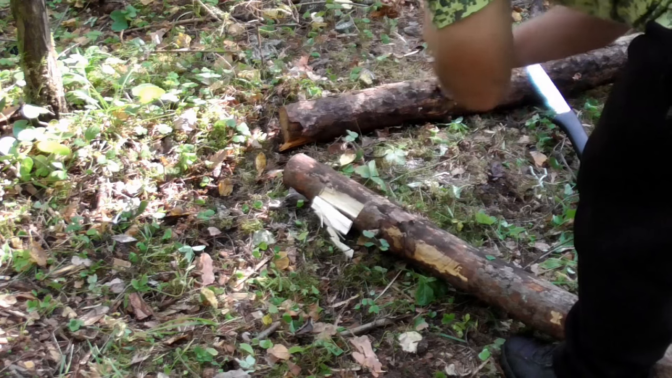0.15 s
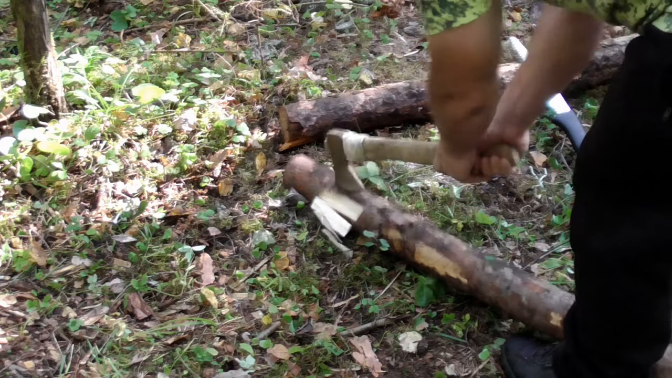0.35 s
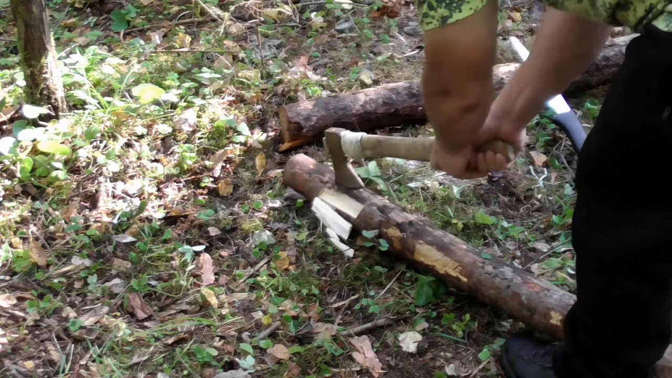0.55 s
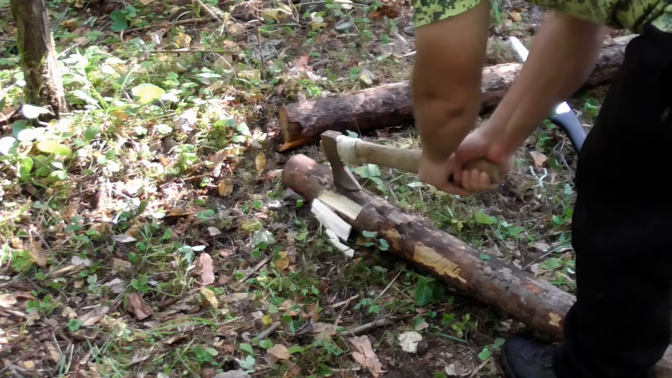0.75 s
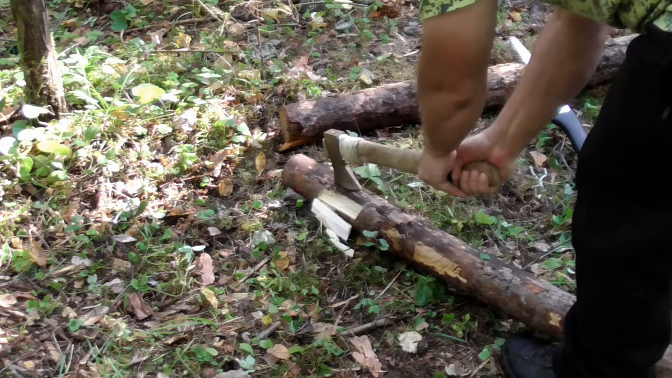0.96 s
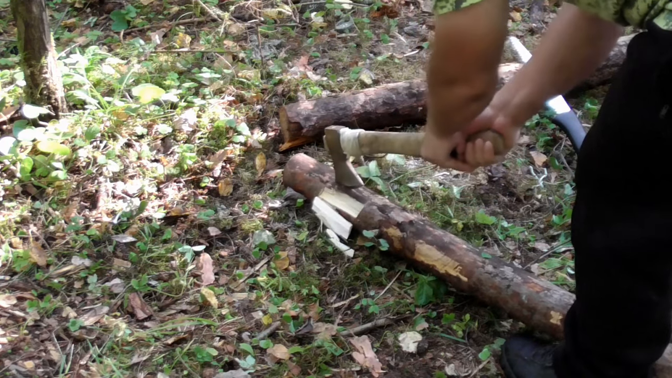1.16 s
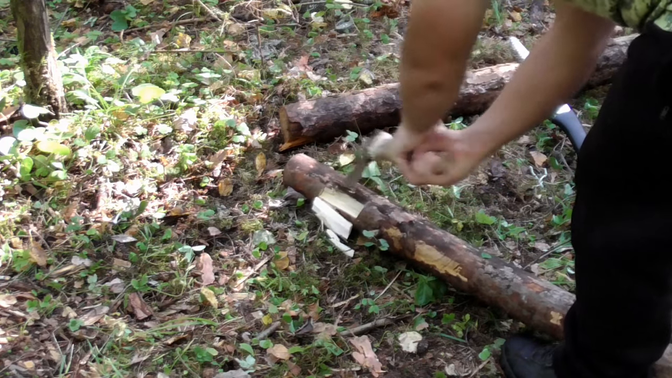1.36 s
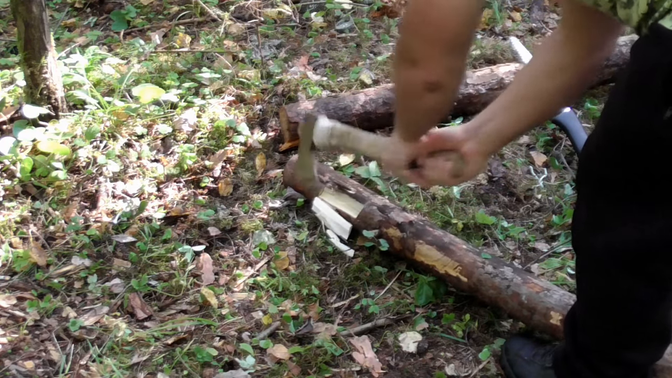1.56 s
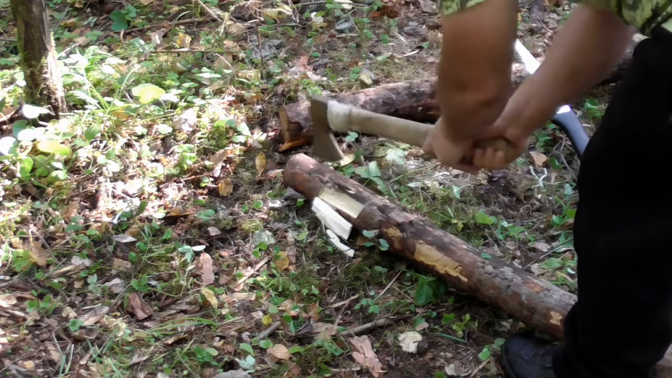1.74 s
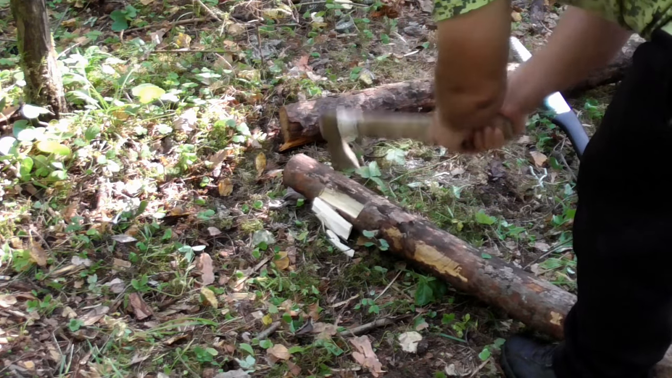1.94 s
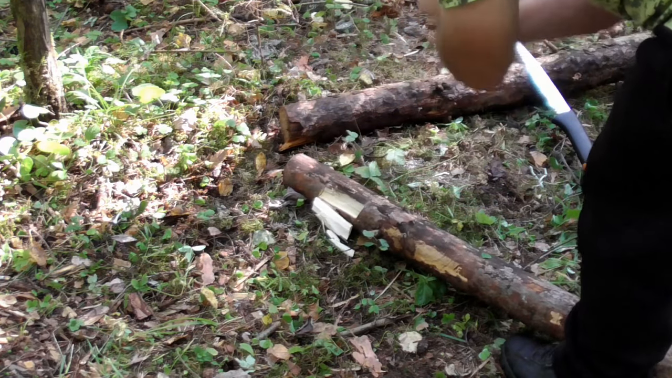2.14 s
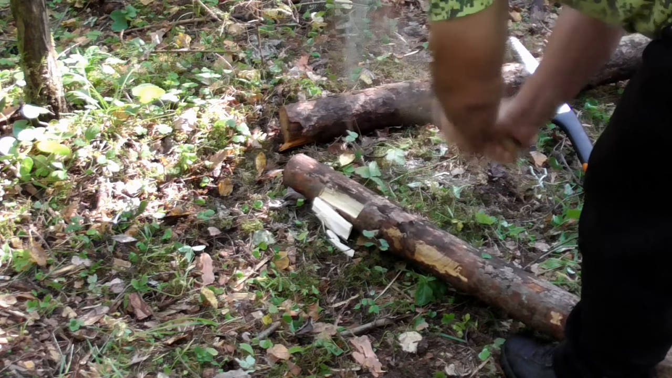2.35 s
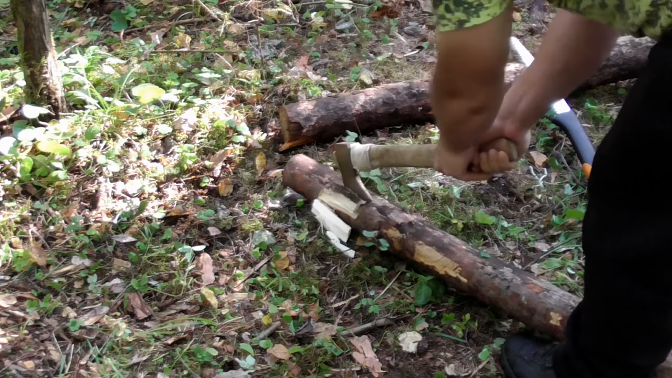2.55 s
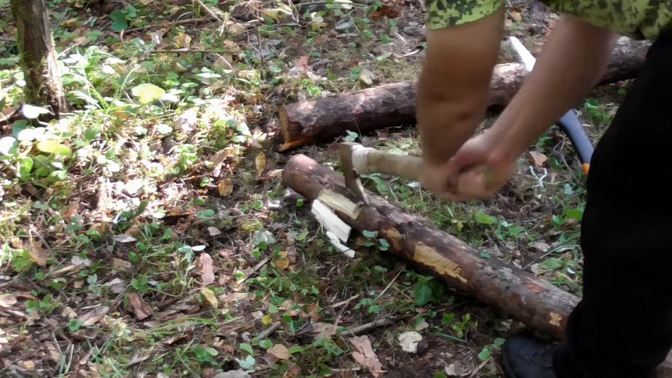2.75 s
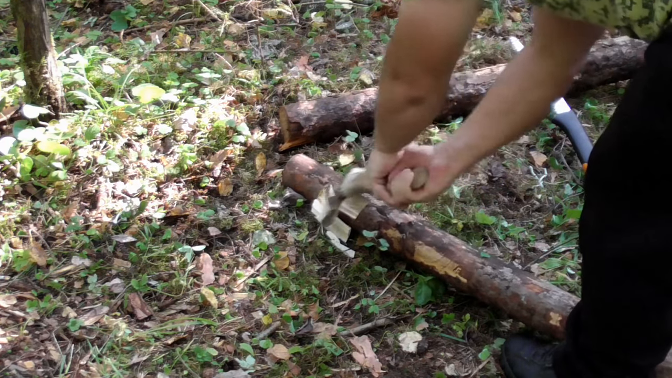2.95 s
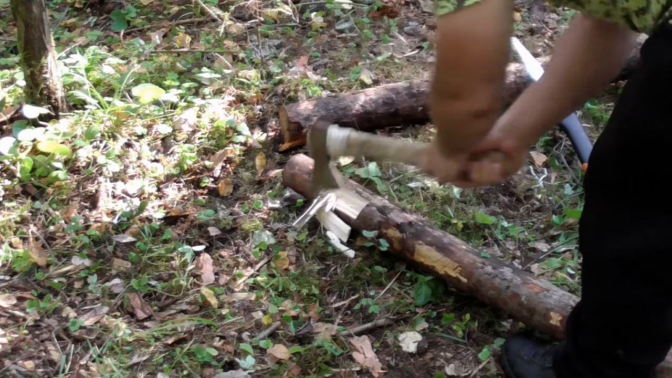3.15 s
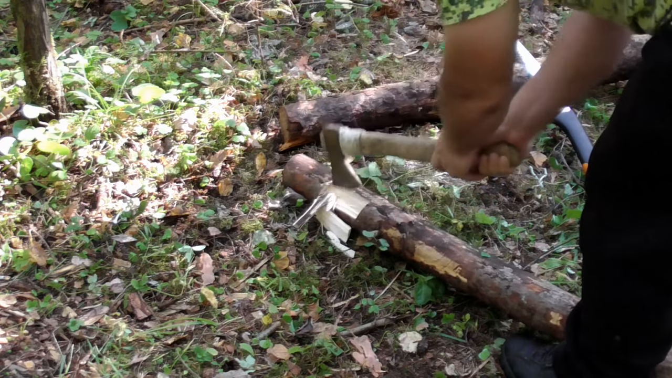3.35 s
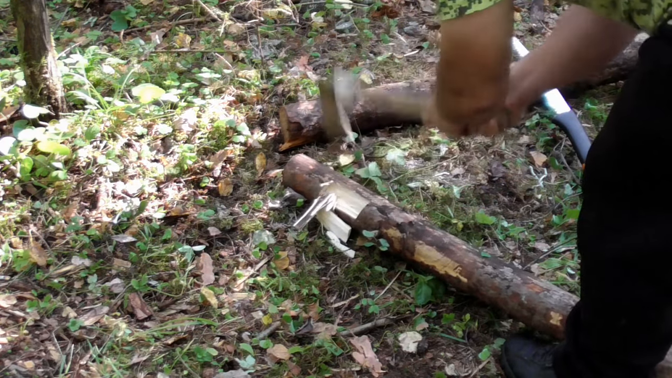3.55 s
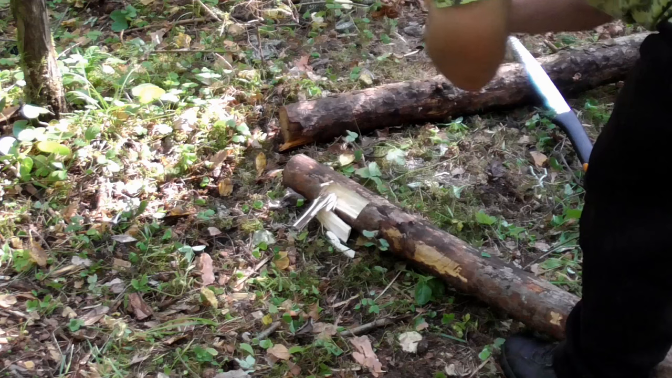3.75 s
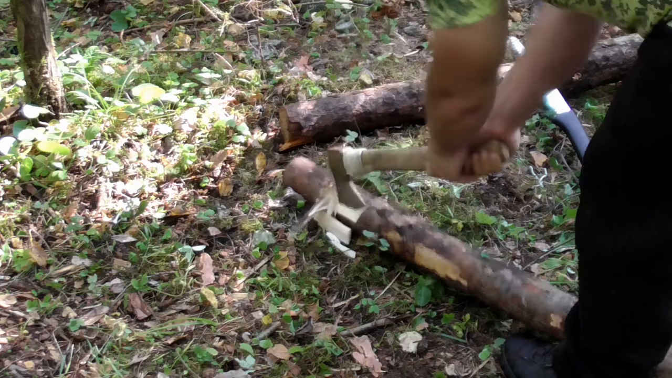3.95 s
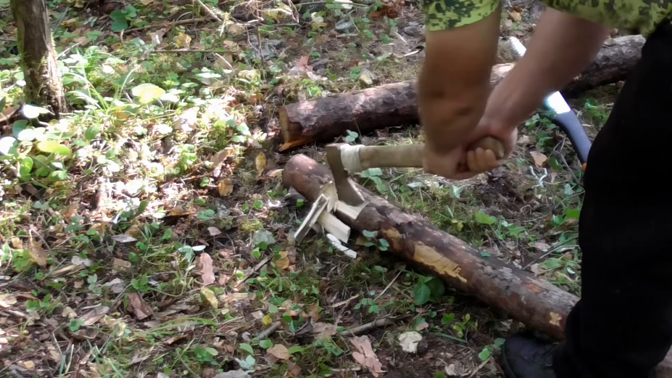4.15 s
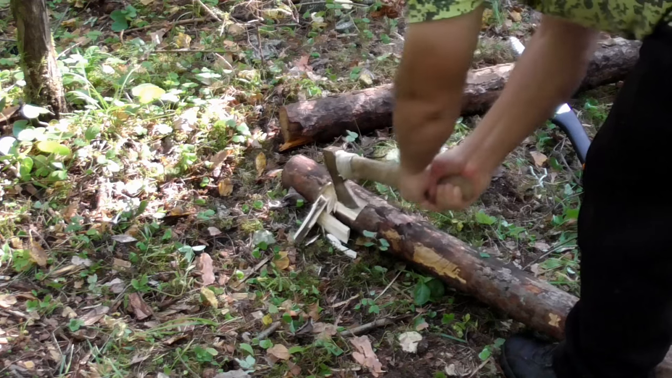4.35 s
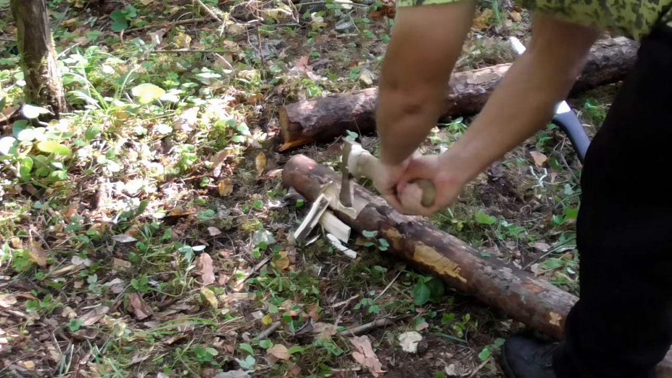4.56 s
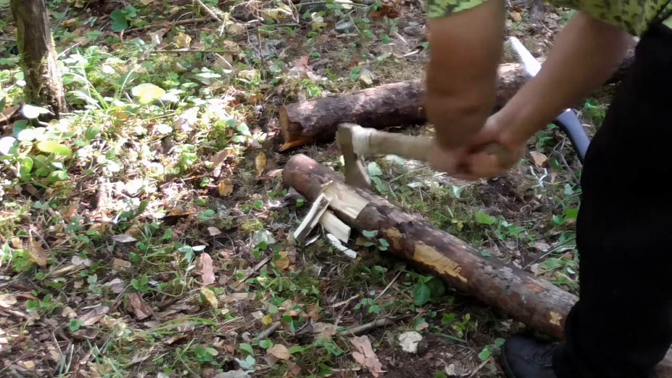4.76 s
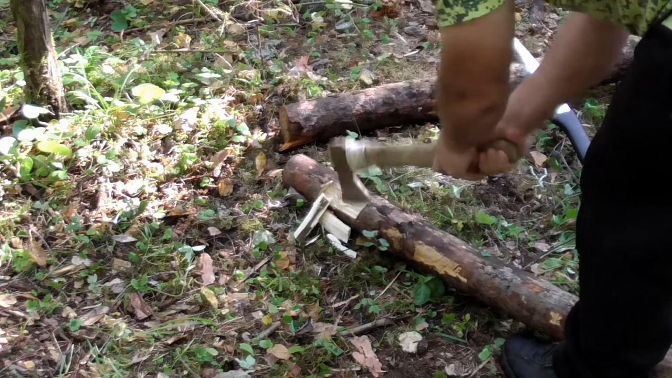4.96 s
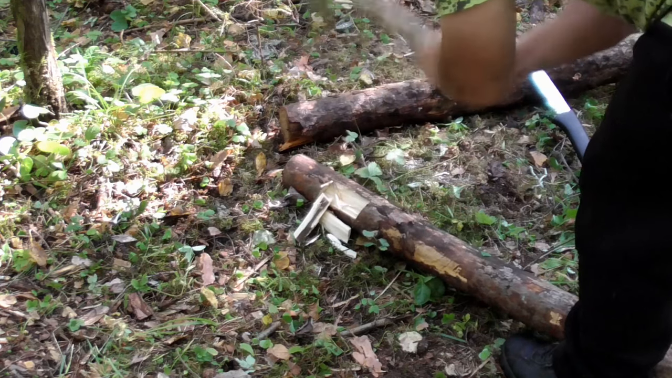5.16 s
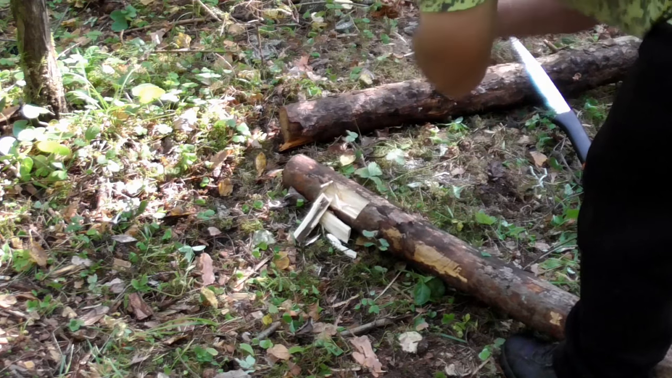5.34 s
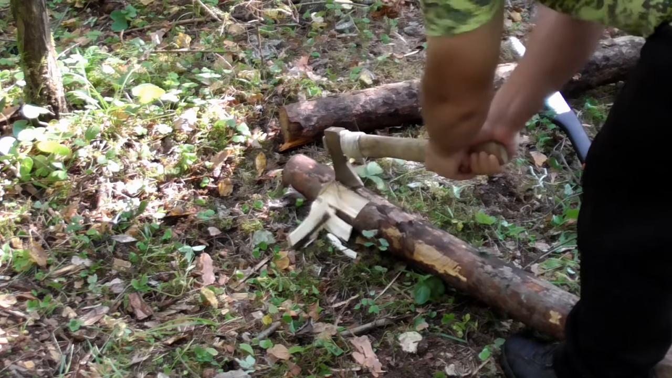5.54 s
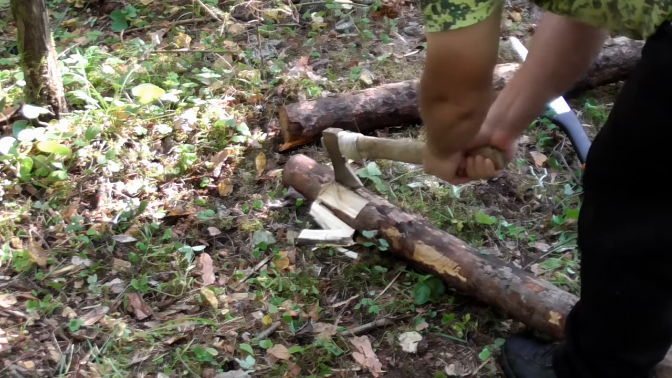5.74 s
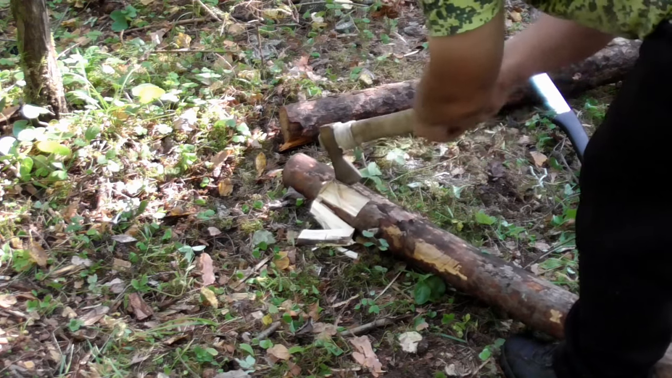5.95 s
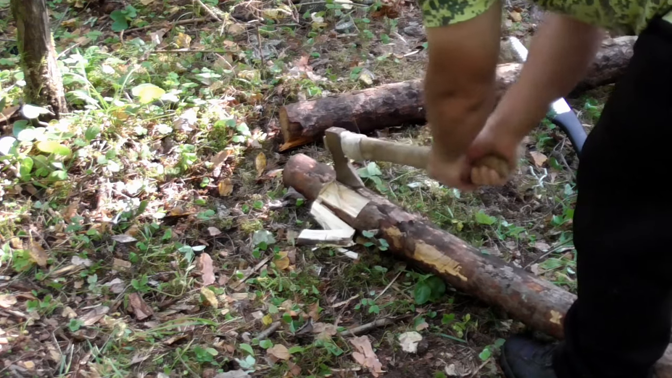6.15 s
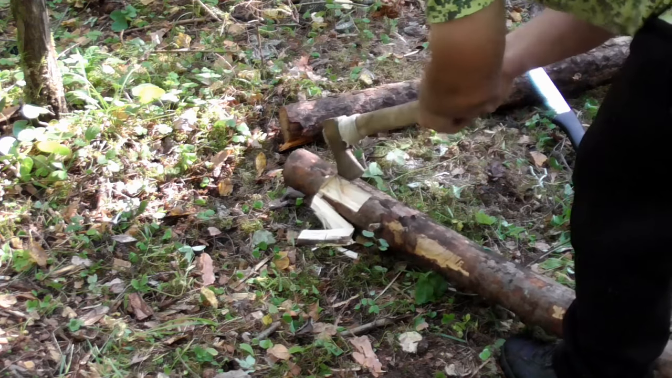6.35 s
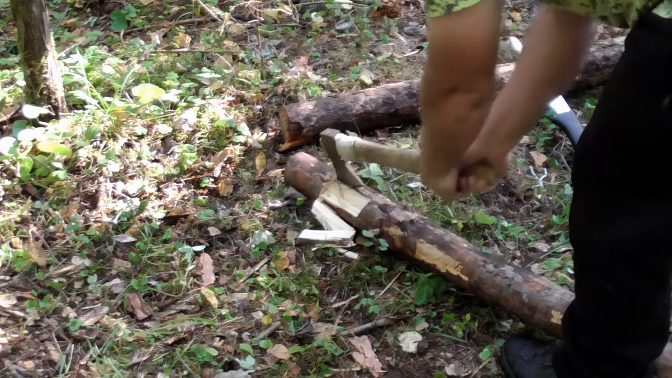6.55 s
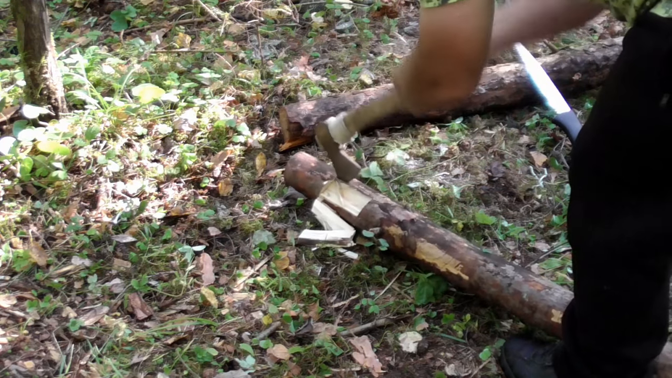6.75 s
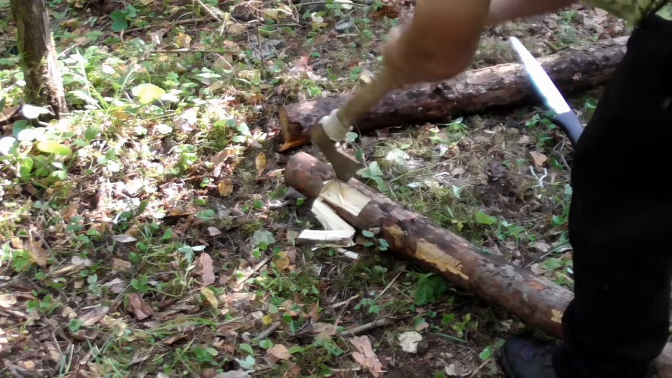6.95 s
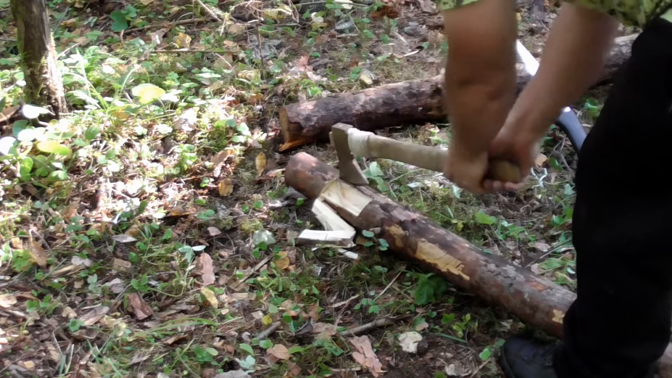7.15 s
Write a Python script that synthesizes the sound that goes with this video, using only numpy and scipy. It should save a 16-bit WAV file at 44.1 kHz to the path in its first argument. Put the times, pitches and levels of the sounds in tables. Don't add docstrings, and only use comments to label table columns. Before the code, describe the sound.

Outdoors in a quiet forest, a close stereo microphone hears an axe working on a log. A low, distant road hum and faint hiss run throughout. At 0.4 s a hard blow cracks sharply, with a short woody knock and a scattered echo from the trees. Small ticks follow, then a loud fibre snap at 1.4 s. A light aiming tap at 1.95 s leads to the hardest, brightest blow at 2.5 s. From 2.8 to 3.1 s the levered blade tears and snaps fibres, ending in tiny steel chinks. A very faint, dull tap at 3.5 s precedes another hard chop at 4.0 s. Dense splintering bursts out between 4.4 and 4.65 s, with a weak creak near 4.75 s. A soft tap at 5.05 s, with a slight chink, sets up the last hard blow at 5.55 s. Levels dip briefly after loud cracks. Afterwards only faint chip ticks and slight rasps remain, until about 7.2 s.

```python
import sys
import numpy as np
from scipy import signal
from scipy.fft import rfft, irfft, next_fast_len
from scipy.io import wavfile
from scipy.ndimage import uniform_filter1d

SR = 44100
rng = np.random.default_rng(int(sys.argv[2]) if len(sys.argv) > 2 else 0)


def attenuation_scalar(level_db):
    decades = np.asarray(level_db, float) / 20
    return 10 ** decades


def transcribe(signal):
    frames = np.atleast_2d(signal).T
    limited = np.clip(frames, -1, 1)
    pcm = np.round(limited * 32767).astype(np.int16)
    wavfile.write(sys.argv[1], SR, pcm)


N = 321930

# start in seconds, crack level in dB, then the low, middle and high
# log modes in dB relative to the crack.
BLOWS = [
    (0.433, -8.5, -9, -13, -1.5),
    (1.9532, -25, -13.5, -39, -11),
    (2.472, -2.5, -20.5, -26, -10),
    (3.502, -38.5, -2.5, 3.5, -24),
    (4.0333, -7, -14.5, -11, -10),
    (5.056, -30, -11.5, -2.5, -3.5),
    (5.5601, -6, -14.5, -19.5, -11.5),
]
# cutting time in seconds, rasp after it in dB,
# bump at 1.5 kHz in dB, shove level in dB, shove frequency in Hz.
CUTS = [(0.0032, -15, -4, 4, 836), (0.0003, 4, -2, -7, 280), (0.0035, -12, 2, -1.5, 870),
        (0.0056, 13, 22, 11.5, 430), (0.0054, -9.5, 6, -1.5, 650), (0.0045, -27.5, 1, 7, 660),
        (0.0032, -15, -10.5, -1, 684)]
# frequency in Hz, level in dB per Hz.
CRACK_SPECTRUM = [(240, -20.5), (400, -5), (913, -9), (1700, -18.5), (2360, -11.5), (3650, -16), (4900, -9),
                  (5730, -16), (8320, -4.5), (9570, -12), (12700, -5.5), (15700, -33), (16500, -33)]
# frequency in Hz, level in dB, t60 in seconds.
SOIL_MODE = (68, -5, 0.24)
# frequency in Hz, level in dB, t60 in seconds.
LOG_MODES = [(173.5, 4, 0.12), (262.3, 2.5, .14), (411.5, 3.5, 0.09), (733, -5.5, .07)]
# frequency in Hz, level in dB, t60 in seconds.
HANDLE_MODES = [(534, -16.5, 0.025), (872, -4.5, 0.022), (1160, -7, 0.03), (1407, -10, 0.031),
                (2142, -10.5, 0.034)]
# start in seconds, level in dB, frequency in Hz, t60 in seconds.
CHINKS = [(3.04, -45, 3320, 0.046), (3.078, -38, 4360, 0.041), (3.131, -41.5, 4260, 0.026),
          (4.8, -60, 8500, 0.16), (4.845, -56, 8450, 0.08), (5.118, -56.5, 8500, 0.061),
          (5.108, -47, 5400, 0.017)]
# start in seconds, level in dB, frequency in Hz, t60 in seconds,
# roughness of the phase in radians.
STEEL_HUMS = [(2.479, -42.5, 4490, 0.36, 1.03), (4.04, -54.5, 4360, 0.27, 1.02),
              (5.569, -55, 4165, 0.84, .7)]
# start in seconds, level in dB, then the woody, mid and top shares in relative dB.
THICK_FIBRES = [(1.3817, -24.5, -13.5, -13, -1.5), (1.3951, -26, -13.5, -9.5, -7),
                (1.3988, -24, -4.5, -10, 1), (1.403, -6.5, -18.5, -7.5, -6.5),
                (1.432, -26.5, -26, -15, -8.5), (2.8091, -25.5, -6.5, -0.5, -5),
                (2.8412, -23.5, -13.5, -5.5, -2), (2.8652, -19, -37.5, -14, -1),
                (2.9105, -15.5, -5, 6.5, 1.5), (2.933, -12.5, -12.5, 1.5, -8), (2.9377, -16.5, -9, -1, -10),
                (2.9456, -26.5, -10.5, -10, -3), (3.06, -27, -5.5, -2.5, -6),
                (4.4155, -25, -18.5, -4.5, -17.5), (4.445, -19, -39.5, -20, -4), (4.4616, -25, -14, 1, -15),
                (4.466, -11.5, -19.5, -7.5, -6.5), (4.4846, -24, -33.5, -3, -5.5),
                (4.5601, -15, -20, -8, -10.5), (4.5706, -9, -16.5, -9.5, -2), (4.5785, -19, -22, -4.5, 3),
                (4.5852, -11.5, -25, -6, -7), (4.6215, -10, -11, -6, -9.5), (4.7564, -36, -7.5, 8, -7)]
# start in seconds, level in dB, then the woody and mid shares in relative dB.
THIN_FIBRES = [(.446, -31.5, -10, -24.5), (.7051, -53.5, -28, -19), (.793, -45.5, -22.5, -10),
               (.9281, -46, -27, -21), (.9493, -45, -32, -15), (6.381, -52, -2, -16),
               (.9929, -51.5, -35, -11), (1.0026, -45, -38, -21), (1.1938, -53.5, -3, -8.5),
               (1.393, -28.5, -9, -6), (2.7976, -33, -14.5, -3), (2.8336, -40.5, -4, -5.5),
               (2.8438, -30, -33.5, 4), (2.8753, -26.5, -20, -12.5), (2.8809, -28.5, -8, -10.5),
               (2.8959, -32.5, -26, -10), (2.9893, -30.5, -19, -2), (3.0466, -35.5, -10, -10.5),
               (3.1417, -36.5, -12, -2), (4.3592, -48, -3, -12.5), (4.5006, -39.5, -12.5, -2.5),
               (4.5271, -29.5, -10, -3), (4.5658, -20, -13.5, -5), (4.5825, -17.5, -7, -8),
               (4.5877, -20.5, -27, -17.5), (4.77, -42.5, -23, 8), (5.7477, -43.5, -5, 6),
               (5.765, -42.5, -30.5, 11), (6.157, -54, -3, -17), (6.172, -49, -10, -4.5)]
# frequency in Hz, width in Hz, level in dB.
FIBRE_MODES = [(190, 340, -13), (695.6, 2000, -2.5), (2150, 3300, -1.5), (5140, 2000, -4), (7500, 2600, -3),
               (11800, 3800, -1.5)]
# start in seconds,
# level in dB, rise in dB per second, hold in seconds, fall in dB per second.
RASPS = [(0.763, -69.5, 300, .2, 296), (0.992, -56, 400, 0.013, 400), (1.389, -37, 901, 0.016, 256.5),
         (2.866, -48.5, 898, .02, 448), (2.936, -45.5, 608, .01, 249.5), (3.06, -49, 200, 0.014, 400),
         (3.133, -54, 400, .015, 1500), (4.349, -64.5, 298, 0.045, 106), (4.415, -51, 3000, .03, 102),
         (4.464, -40.5, 498, .02, 146), (4.565, -35.5, 400, 0.027, 1200), (4.754, -51.5, 2996, .028, 1500),
         (5.74, -60, 504, .02, 399.5), (6.36, -64.5, 200, 0.022, 199), (7.137, -65, 228, 0.043, 200)]
# frequency in Hz, level in dB per Hz.
SPLINTER_SPECTRUM = [(1180, -43.5), (2000, -10.5), (3060, -9.5), (3310, -3), (4020, -8.5), (5280, -4.5),
                     (7650, -4), (9210, -1), (12200, -7), (15400, -17.5), (16500, -31.5)]
# frequency in Hz, t60 in seconds.
NEAR_TREES_T60 = [(200, 0.23), (1500, 0.34), (3300, 0.37), (4300, 0.33), (5500, 0.36), (9000, 0.67),
                  (14000, 0.68)]
# frequency in Hz, level in dB.
NEAR_TREES_COLOUR = [(200, 1), (800, 4), (2000, -11), (3000, -6.5), (4500, 0.5), (6000, -3.5), (8000, -2.5),
                     (11500, -5), (15000, -10.5), (17000, -27)]
# frequency in Hz, level in dB.
FAR_TREES_COLOUR = [(300, -16.5), (1500, -5.5), (3400, -14.5), (4300, -11), (5500, -20.5), (9000, -28.5),
                    (14000, -35)]
# frequency in Hz, level in dB per Hz.
ROAD_SPECTRUM = [(9.4, -76.5), (16, -28.5), (32, -25.5), (86, -13), (206, -11), (278, -5.5), (366, -4),
                 (399, -2), (453, -4), (549, -4.5), (806, -9), (916, -13), (1210, -18), (1660, -30.5),
                 (2600, -43), (3380, -75.5), (5720, -120)]
# frequency in Hz, level in dB per Hz.
HISS_SPECTRUM = [(1290, -33.5), (2200, 0), (2430, -9.5), (2650, -8), (2960, -7.5), (3620, -8), (4210, -5),
                 (5800, -10.5), (10600, -2.5), (11600, -3.5), (14400, -3.5), (16100, -18), (16500, -34)]
# frequency in Hz, left-right likeness from 0 to 1.
LIKENESS = [(60, 1), (125, 0.81), (350, 0.71), (700, 0.66), (1400, .33), (2800, 0.23), (5600, 0.39),
            (11000, 0.0052)]
# frequency in Hz, left-right level in dB.
PORT_COLOUR = [(60, 1), (300, 1), (1400, 1.56), (2800, -1.25), (5600, 0.8), (11000, -2)]
# frequency in Hz, lead of the left port in radians.
PORT_LEAD = [(60, .1), (430, .1), (1460, -.2), (5430, -.2), (8100, -.4), (8610, -.9), (9470, -2.9),
             (10300, -6.3)]
# start in seconds, gain loss in dB.
DUCKS = [(.44, 1), (1.41, 3.5), (2.48, 9), (2.94, 5), (4.04, 1.5), (4.6, 6), (5.57, 5.5)]

THUD_DB = -4.5
TILT_DB, TILT_GROWS = -0.5, 0.1
BUMP_HZ, DIP_HZ, DIP_DB = 1480, 2976, -5
SHOVE_T60_S, SHOVE_RISE = 0.012, 0.15
RASP_SPAN_DB = 28
THIN_DB, THIN_SPREAD_DB = (-20, -8, -5.5), (4, -0.5, 3.5)
PAN_SPREAD_DB = 5.5
STRAY_PER_S, STRAY_DB, STRAY_SPREAD_DB = 80, 8.5, 4
STRAY_TOP_DB, STRAY_FROM_DB = -30, -52
ROAD_DB, HISS_DB = -49.5, -69


def unit(x):
    return x / np.sqrt(np.mean(x ** 2, axis=-1, keepdims=True) + 1e-20)


def along(points, hz):
    f, value = np.transpose(points)
    return np.interp(np.log(hz + 1), np.log(f + 1), value)


def filtered(x, response):
    n = x.shape[-1]
    m = next_fast_len(n + min(n, 8192))
    return irfft(rfft(x, m) * response(np.fft.rfftfreq(m, 1 / SR)), m)[..., :n]


def add(out, s, sound):
    start = round(s * SR)
    part = out[..., start:start + sound.shape[-1]]
    part += sound[..., :part.shape[-1]]


def ring(hz, db, t60, attack, rough):
    t = np.arange(SR // 3) / SR
    wander = rough * np.cumsum(rng.standard_normal(len(t))) * np.sqrt(hz / SR)
    apart = rng.uniform(0.19, 0.21) * np.array([[1], [-1]])
    envelope = attenuation_scalar(db - 60 * t / t60) * (1 - np.exp(-t / attack))
    return envelope * np.sin(2 * np.pi * hz * t + wander + apart)


def crack(db, cut, rasp_db, bump_db):
    t = np.arange(SR // 20) / SR
    bite = 1 / (1 + (t / cut) ** 6)
    cutting = (1 - np.exp(-t / 0.000067)) * (bite + attenuation_scalar(rasp_db - 60 * t / 0.025))
    noise = rng.standard_normal(len(t)) + 0.3 * rng.standard_normal((2, len(t)))

    def bump(hz, centre_hz):
        return np.exp(-(np.log2(hz / centre_hz + 1e-9) / 0.17) ** 2)

    def colour(hz):
        tilt = (TILT_DB + TILT_GROWS * db) * np.log2(hz / 3000 + 0.037)
        bumps = bump_db * bump(hz, BUMP_HZ) + DIP_DB * bump(hz, DIP_HZ)
        return attenuation_scalar(along(CRACK_SPECTRUM, hz) + tilt + bumps)

    return attenuation_scalar(db - 8.5) * cutting * unit(filtered(noise, colour))


def blows():
    out = np.zeros((2, N))
    for (s, db, low_db, middle_db, high_db), (cut, rasp_db, bump_db, shove_db, shove_hz) in zip(BLOWS, CUTS):
        add(out, s, crack(db, cut, rasp_db, bump_db))
        add(out, s, ring(shove_hz, db + shove_db - 0.5, SHOVE_T60_S, attack=SHOVE_RISE * cut, rough=0.098))
        thud_db = low_db + THUD_DB
        shares = [thud_db, thud_db, low_db, middle_db, high_db]
        for (hz, level, t60), share in zip([SOIL_MODE] + LOG_MODES, shares):
            add(out, s, ring(hz, db + share + level, t60, attack=0.0048, rough=0.57))
        for hz, level, t60 in HANDLE_MODES:
            gripped_hz = hz * (1 + rng.normal(0, 0.016))
            gripped_db = db + high_db + level + rng.normal(0, 1)
            add(out, s, ring(gripped_hz, gripped_db, t60, attack=0.00033, rough=0.61))
    return out


def blow_push():
    push = np.zeros(N)
    for s, db, *_ in BLOWS:
        push[round(s * SR)] = attenuation_scalar(db)
    return push


def chinks():
    out = np.zeros((2, N))
    for s, db, hz, t60 in CHINKS:
        add(out, s, ring(hz, db, t60, attack=0.0014, rough=0.1))
    return out


def buried_steel():
    out = np.zeros((2, N))
    for s, db, hz, t60, rough in STEEL_HUMS:
        add(out, s, ring(hz, db, t60, attack=0.0037, rough=rough))
    return out[0]


def strain_db():
    s, db, rise, hold, fall = np.transpose(RASPS)[..., None]
    t = np.arange(N) / SR - s
    under = np.maximum(np.maximum(-rise * t, fall * (t - hold)), 0)
    return np.where(under < RASP_SPAN_DB, db - under, -120).max(0)


def fibres_parting():
    count = round(STRAY_PER_S * N / SR)
    s = rng.uniform(0, N / SR, count)
    strain = strain_db()[(s * SR).astype(int)]
    db = strain + STRAY_DB + STRAY_SPREAD_DB * rng.standard_normal(count)
    db = np.minimum(np.where(strain > STRAY_FROM_DB, db, -120), STRAY_TOP_DB)

    spread = np.multiply(THIN_SPREAD_DB, rng.standard_normal((count + len(THIN_FIBRES), 3)))
    woody, mid, top = np.add(THIN_DB, spread).T
    strays = np.c_[s, db, woody[:count], mid[:count]]
    thin = np.c_[np.r_[THIN_FIBRES, strays], top]
    rows = np.r_[THICK_FIBRES, thin]
    rows = np.c_[rows, PAN_SPREAD_DB * rng.standard_normal(len(rows))]
    return rows[rows[:, 1] > -70]


def snaps():
    out = np.zeros((2, N))
    t = np.arange(SR // 80) / SR
    burst = (t / 0.00022) ** 2 * np.exp(-t / 0.00022) + 0.03 * np.exp(-t / 0.003)
    grain = rng.standard_normal((len(FIBRE_MODES), 3, 2 * SR))
    centre, width, level = np.transpose(FIBRE_MODES)[..., None, None]

    def peaks(hz):
        return (1j * hz * width / (centre ** 2 - hz ** 2 + 1j * hz * width)) ** 2

    for s, db, woody_db, mid_db, top_db, pan_db in fibres_parting():
        upper = np.sqrt(max(1 - attenuation_scalar(2 * mid_db) - attenuation_scalar(2 * top_db), 0.04))
        woody = attenuation_scalar(woody_db)
        share = np.array([woody, woody, woody, attenuation_scalar(mid_db), upper, attenuation_scalar(top_db)])
        sides = attenuation_scalar(np.outer([0, 0, -0.2, 0, 0.7, 0], [pan_db / 2, -pan_db / 2]))
        start = round(s * SR) % SR
        piece = grain[..., start:start + len(t)]
        noise = piece[:, :1] + 0.35 * piece[:, 1:]
        bands = unit(filtered(burst * noise, peaks)) * attenuation_scalar(level) * (share[:, None] * sides)[..., None]
        add(out, s - 0.0006, attenuation_scalar(db - 12.5) * bands.sum(0))
    return out


def tearing():
    sizes = attenuation_scalar(4.5 * rng.standard_normal(N)) * (rng.random(N) < 700 / SR)
    grains = np.convolve(sizes, np.exp(-np.arange(60) / 14))[:N] + 0.3
    pair = rng.standard_normal(N) + 0.7 * rng.standard_normal((2, N))
    splinters = filtered(grains * pair, lambda hz: attenuation_scalar(along(SPLINTER_SPECTRUM, hz)))
    return attenuation_scalar(strain_db()) * unit(splinters)


def trees(x):
    out, size = np.zeros((2, N)), SR // 2
    for start in range(0, N, size):
        hz, t, z = signal.stft(rng.standard_normal((2, SR)), SR, nperseg=256)
        near_db = along(NEAR_TREES_COLOUR, hz)[:, None] - 60 * t / along(NEAR_TREES_T60, hz)[:, None]
        far_db = along(FAR_TREES_COLOUR, hz)[:, None] - 60 * t / 0.8
        tail = signal.istft(z * (attenuation_scalar(near_db) + attenuation_scalar(far_db)), SR, nperseg=256)[1]
        tail = tail / np.linalg.norm(tail[0])
        answer = signal.fftconvolve(x[None, start:start + size], tail, axes=1)
        add(out, start / SR + 0.0057, answer)
    return out


def rush(spectrum, patchy_db):
    z = signal.stft(rng.standard_normal((2, N)), nperseg=512)[2]
    field = uniform_filter1d(rng.standard_normal(z.shape[1:]), 6, 0)
    field = uniform_filter1d(field, 14, 1)
    pair = signal.istft(z * attenuation_scalar(patchy_db * field / field.std()), nperseg=512)[1][:, :N]

    def mid_side(hz):
        turn = np.arccos(np.clip(along(LIKENESS, hz), -1, 1)) / 2
        return attenuation_scalar(along(spectrum, hz)) * [np.cos(turn), np.sin(turn)]

    mid, side = filtered(pair, mid_side)
    return unit(np.array([mid + side, mid - side]))


def background():
    return attenuation_scalar(ROAD_DB) * rush(ROAD_SPECTRUM, 2.0) + attenuation_scalar(HISS_DB) * rush(HISS_SPECTRUM, 1.95)


def scene():
    axe = blows() + chinks()
    fibres = snaps() + tearing()
    close = filtered(axe + fibres, lambda hz: (1j * hz / (1j * hz + 55)) ** 3)
    sent = attenuation_scalar(-4.5) * blow_push() + attenuation_scalar(-18.5) * fibres.mean(0) + buried_steel()
    return close + trees(sent) + background()


def ports(x):
    def response(hz):
        colour = attenuation_scalar(np.outer([0.5, -0.5], along(PORT_COLOUR, hz)))
        lead = np.exp(np.outer([0.5j, -0.5j], along(PORT_LEAD, hz)))
        return colour * lead / (1 + (hz / 16800) ** 120)

    return filtered(x, response)


def limiter_gain():
    s, loss_db = np.transpose(DUCKS)
    t = np.maximum(np.arange(N) / SR - s[:, None], 0)
    dip = (1 - np.exp(-t / 0.041)) * np.exp(-(t / 0.26) ** 2)
    return attenuation_scalar(-loss_db @ dip)


def top_cut(x):
    return signal.sosfilt(signal.butter(12, 16980, fs=SR, output="sos"), x)


def record(dry):
    return top_cut(ports(dry) * limiter_gain())


dry = scene()
out = record(dry)
transcribe(out)
```